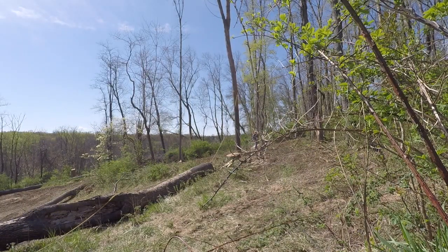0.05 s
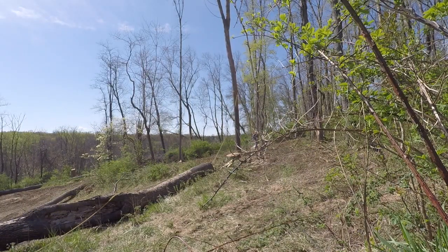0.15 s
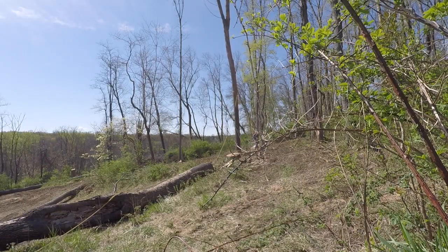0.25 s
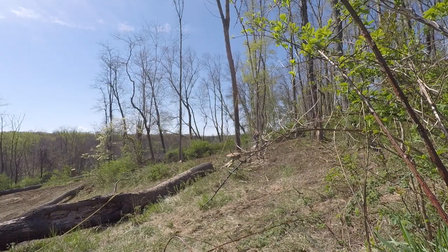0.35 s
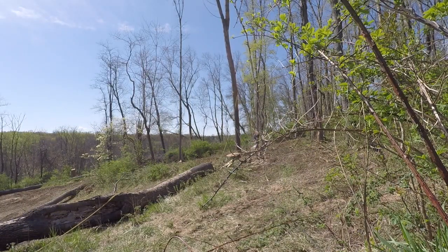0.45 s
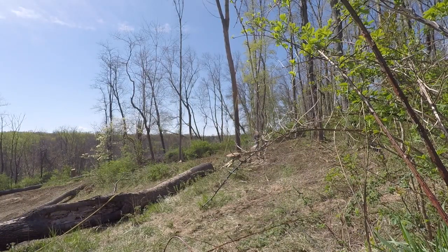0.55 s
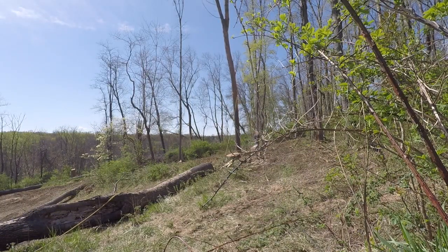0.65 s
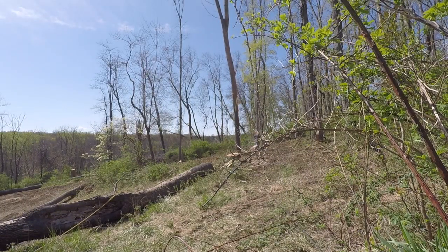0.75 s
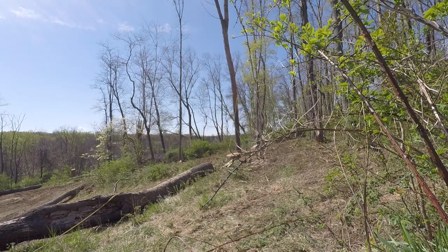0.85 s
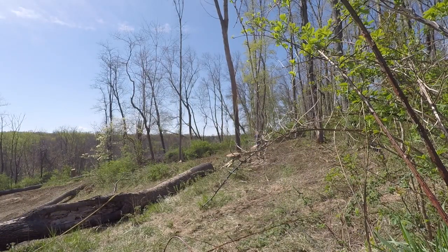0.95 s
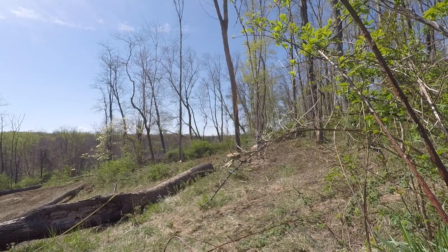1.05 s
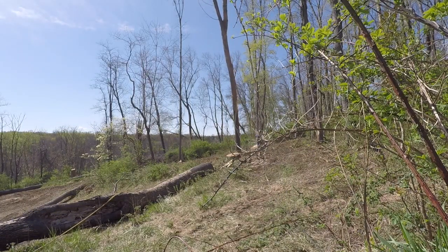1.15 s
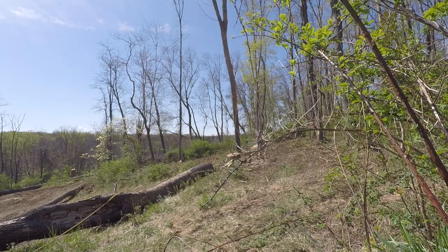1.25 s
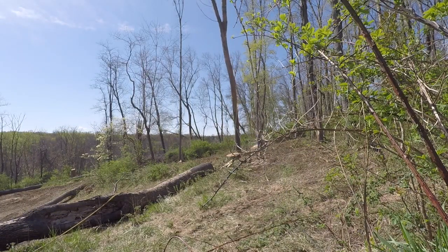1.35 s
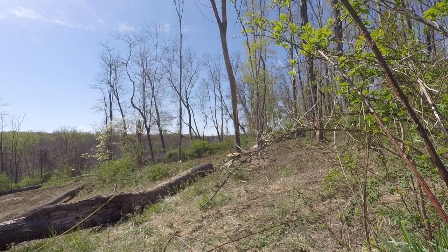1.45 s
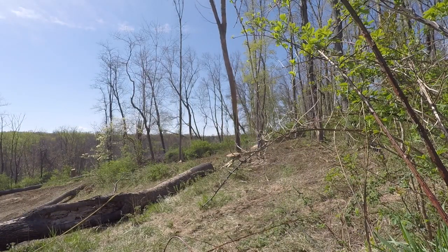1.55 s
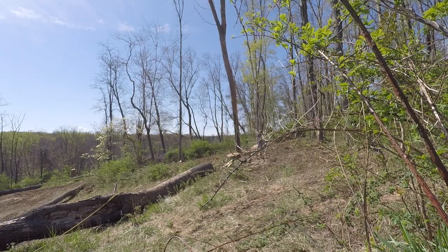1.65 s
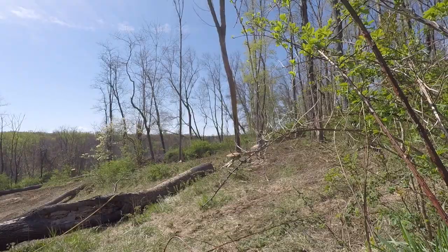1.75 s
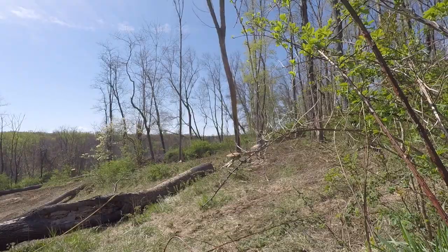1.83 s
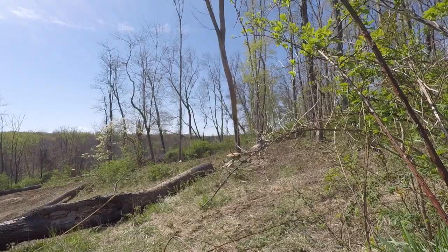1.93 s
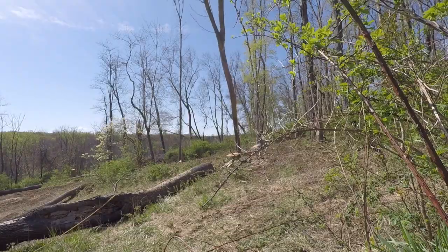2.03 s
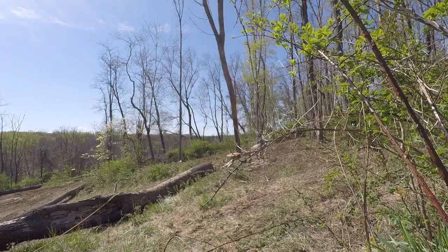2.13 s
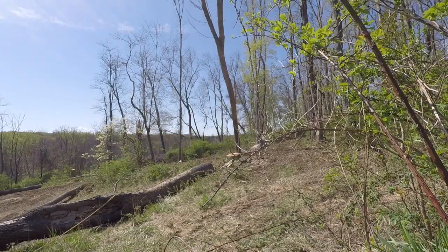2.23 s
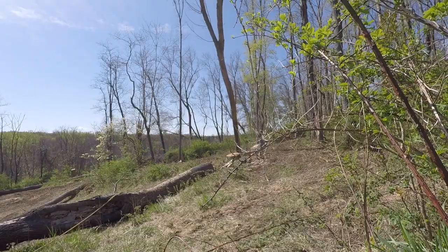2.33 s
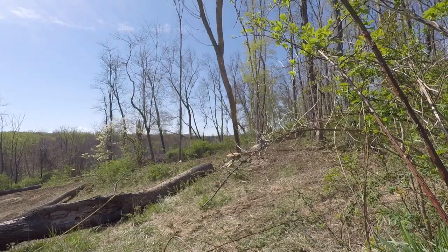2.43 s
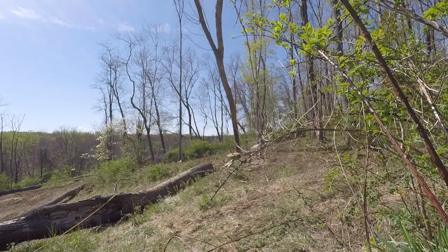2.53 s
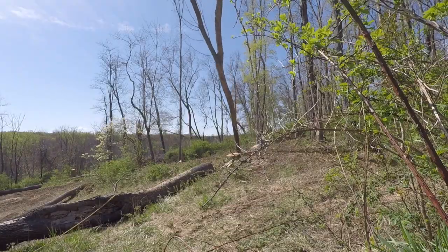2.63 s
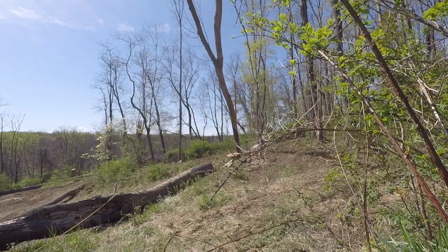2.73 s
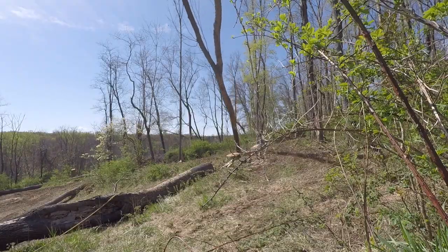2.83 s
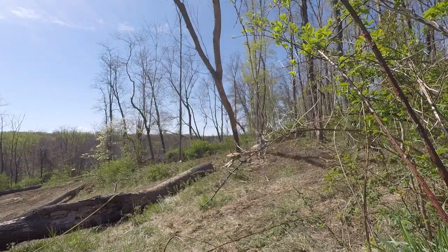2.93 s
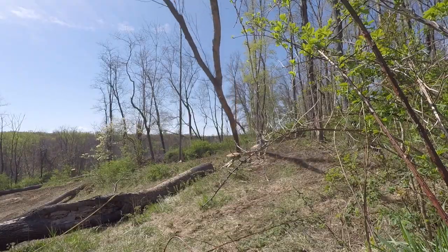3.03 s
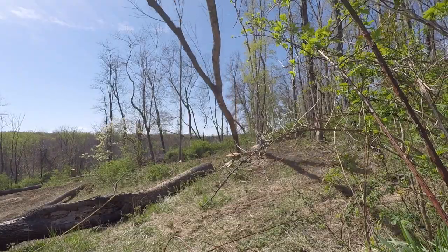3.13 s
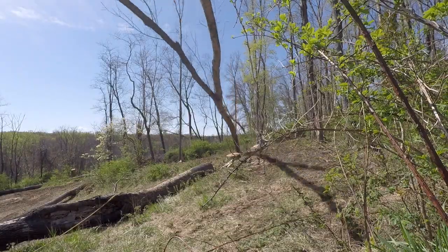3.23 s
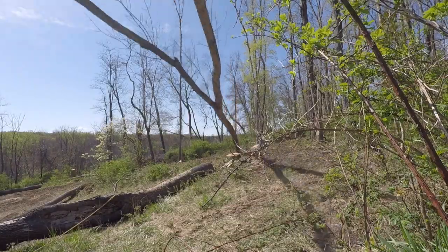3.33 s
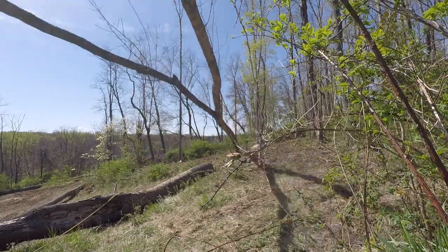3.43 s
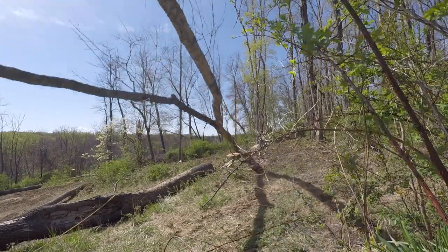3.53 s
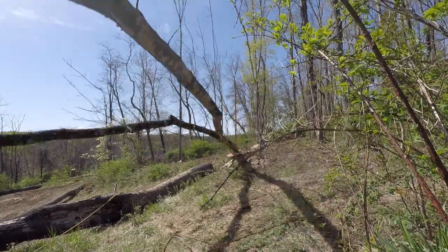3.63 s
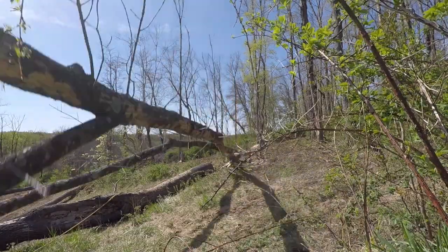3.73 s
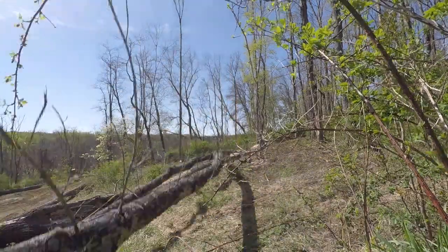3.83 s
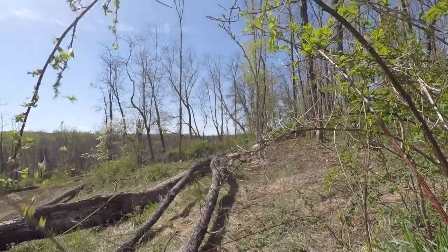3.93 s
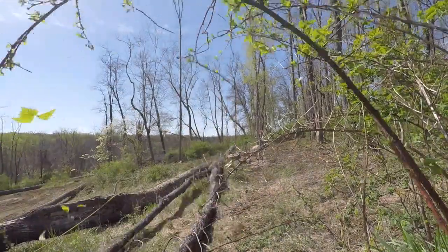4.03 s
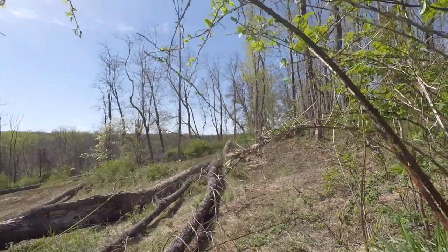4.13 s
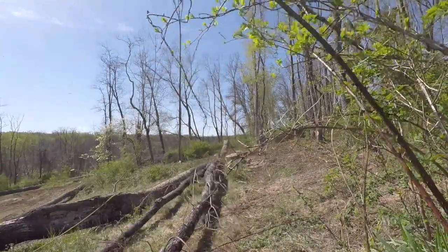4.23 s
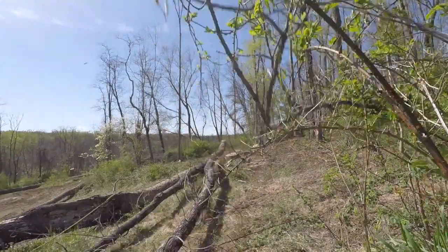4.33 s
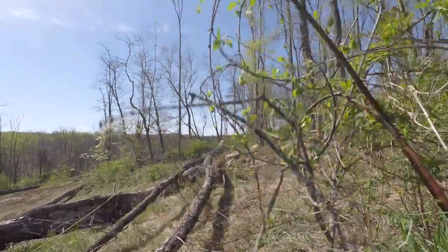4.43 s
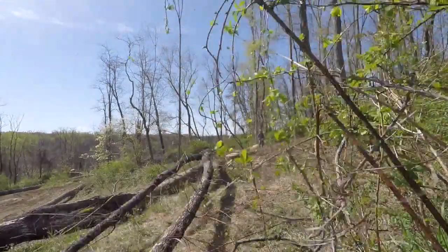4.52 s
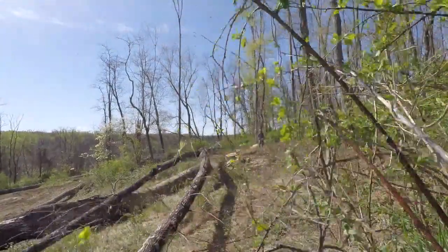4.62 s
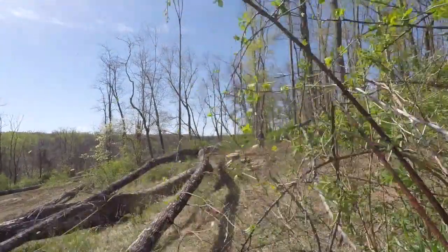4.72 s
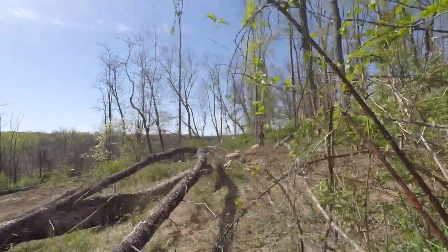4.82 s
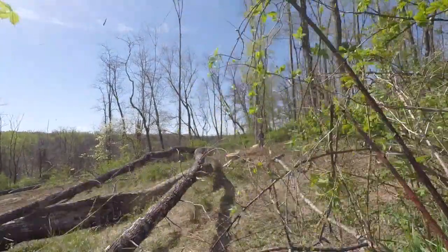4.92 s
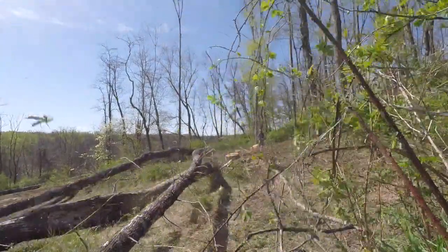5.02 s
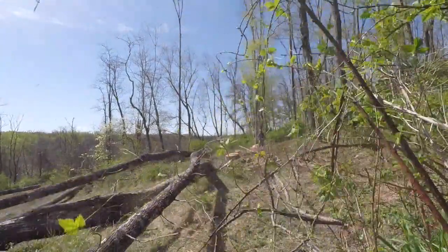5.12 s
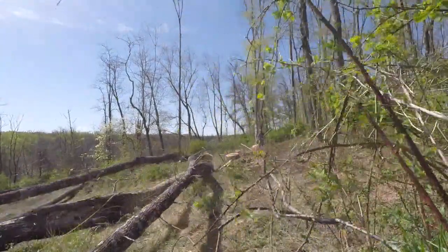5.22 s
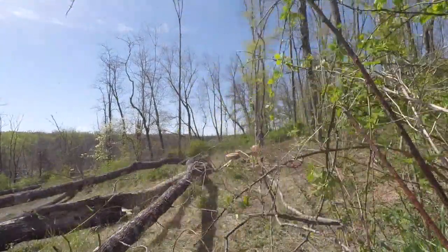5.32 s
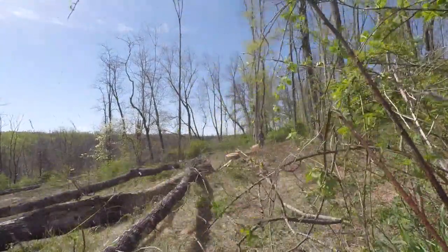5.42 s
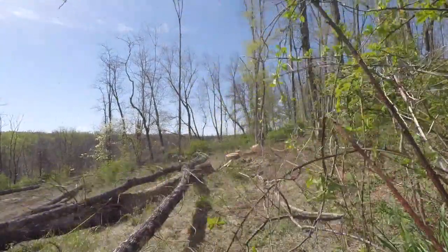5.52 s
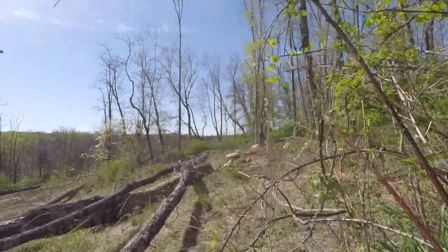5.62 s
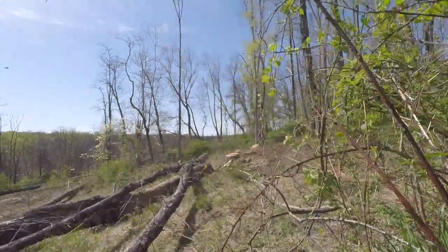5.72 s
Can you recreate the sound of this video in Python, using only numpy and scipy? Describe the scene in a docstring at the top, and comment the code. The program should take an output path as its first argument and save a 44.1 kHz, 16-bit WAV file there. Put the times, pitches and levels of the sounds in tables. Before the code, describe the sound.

A dead tree snaps and splinters at its base, topples with a rising swish and crashes down while a motor throbs slowly nearby.

```python
"""Dead tree falling in a woodlot

A motor throbs slowly, built from filtered exhaust puffs, while ringing snaps crack the base of a dead tree.
Stick-slip groans tip it over, and its crown swishes down as filtered noise that gathers speed.
Limbs shatter in crackle and ringing knocks, the trunk thuds as damped sines, then twigs and brush settle.
The surrounding trees scatter cracks, knocks and scrapes in noise tails; the crash overloads the microphone."""
import sys
import numpy as np
from scipy import signal
from scipy.fft import rfft, irfft, next_fast_len
from scipy.io import wavfile

SR = 44100
rng = np.random.default_rng(int(sys.argv[2]) if len(sys.argv) > 2 else 0)


def generate_wav(sig):
    """Save sig (samples, or channels by samples) to the path in sys.argv[1] as 16-bit PCM at SR."""
    pcm = np.round(np.clip(np.atleast_2d(sig).T, -1, 1) * 32767).astype(np.int16)
    wavfile.write(sys.argv[1], SR, pcm)


N = 254456  # length in samples

# Spectra give relative levels: the filtered noise or pulse train is brought to rms 1.

# level of the throb as heard; it dips at the crash, then slowly comes part of the way back:
# (time [s], level [dB])
THROB_LEVEL = [(0, -22.5), (3.4, -22), (3.85, -19.5), (4.15, -33), (4.45, -45), (5.0, -41.5), (5.77, -33)]
# colour of the exhaust puffs: (frequency [Hz], level [dB])
EXHAUST_SPECTRUM = [(8, -18), (19, 4.5), (38, -11.5), (57, -6.5), (76, -12), (100, -22.5), (150, -34),
                    (250, -34), (600, -82)]
# low rumble under the puffs: (frequency [Hz], level [dB per Hz])
RUMBLE_SPECTRUM = [(10, -16.5), (25, 2.5), (50, 3.5), (90, 2.5), (140, -12), (250, -20.5), (500, -67.5)]
# level of the clatter as heard, with a dip at the crash: (time [s], level [dB])
CLATTER_LEVEL = [(0, -38.5), (1.7, -38.5), (3.8, -36.5), (4.45, -50), (5.77, -38.5)]
# colour of the motor's clatter: (frequency [Hz], level [dB per Hz])
CLATTER_SPECTRUM = [(15, -42.5), (50, -30.5), (130, -26), (205, -35), (310, -29), (450, -33.5),
                    (660, -32.5), (850, -39.5), (1250, -38.5), (2000, -44.5), (3500, -52), (5000, -74),
                    (7600, -82.5)]
FIRING_HZ = 19.0

# rustle of breaking wood: (frequency [Hz], level [dB per Hz])
WOOD_SPECTRUM = [(200, -18), (500, 11.5), (850, 5.5), (1300, -3.5), (2000, -4), (2800, -8), (4000, -14),
                 (7500, -29)]
# fizz of fine twigs: (frequency [Hz], level [dB per Hz])
TWIG_SPECTRUM = [(1000, -11.5), (2500, 2), (3500, -1), (5000, -5), (7500, -14.5)]
# ticking of strained fibres, later of settling brush; the wood trim is added to the woody level:
# (time [s], woody crackle level before trim [dB], fine twig level [dB])
TICKING_LEVELS = [(0, -32, -46.5), (.75, -41, -69), (1.4, -39.5, -55), (2.2, -44.5, -77), (3.3, -37, -65.5),
                  (4.45, -41, -46.5), (4.85, -44, -52), (5.45, -50.5, -59.5)]
# splintering as the stump splits and boughs plough into brush; woody level again before its trim:
# (start [s], rise [s], hold [s], decay t60 [s], woody crackle [dB], fine twigs [dB], whoosh [dB])
SPLINTER_BURSTS = [(.005, 0.019, 0.039, 1.8, -43, -54, -40.5), (0.353, 0.043, 0.062, 0.46, -37, -60, -41.5),
                   (0.969, 0.016, 0.027, .5, -35, -45, -42), (1.114, 0.0054, 0.022, 0.76, -34, -41, -38.5),
                   (1.605, .003, .01, 0.41, -41, -44, -56), (3.685, 0.017, .02, .2, -27.5, -36.5, -29),
                   (3.795, .005, .02, 0.23, -19.5, -41, -17), (3.843, .008, 0.024, .25, -12.5, -27, -18.5),
                   (3.88, 0.0086, 0.025, 0.43, -16, -25, -13.5),
                   (3.92, 0.011, 0.02, 0.23, -14.5, -22.5, -21),
                   (4.03, 0.0091, 0.015, 0.36, -17, -39, -17.5),
                   (4.107, 0.063, 0.17, 0.34, -26.5, -40, -29.5),
                   (4.548, .004, 0.017, 0.13, -35.5, -49, -45.5), (4.632, .02, 0.052, .5, -51, -60.5, -47),
                   (4.992, .004, 0.018, 0.17, -34, -56, -37.5),
                   (5.031, 0.025, 0.013, 0.38, -29, -64, -28.5),
                   (5.268, 0.0087, 0.016, 0.26, -42.5, -57, -45),
                   (5.598, 0.064, 0.021, 0.45, -35, -46, -40), (5.701, 0.096, .02, .3, -23, -31.5, -26.5)]
# whoosh around its centre: (multiple of the centre frequency [ratio], level [dB per Hz])
WHOOSH_SHAPE = [(.15, -34.5), (.5, -3), (.8, -1), (1, -1), (1.3, -3.5), (1.8, -8), (3, -31.5), (8, -55.5)]
BOUGH_HZ = 239.4  # centre of a heavy bough's whoosh in the brush

# sharp snaps; the edge trim is added to the edge level:
# (time [s], ring peak [dB], ring pitch [Hz], bright edge peak before trim [dB], tearing [0-1])
CRACK_EVENTS = [(.038, -19, 1400, -30, 0.4), (.051, -12, 1110, -44, 0.2), (.114, -25, 2600, -32, .03),
                (.135, -26, 2400, -27.5, 0.2), (.291, -16, 1920, -22, 0.1), (.419, -16.5, 2640, -26, 0.06),
                (.437, -13.5, 2200, -36, 0.24), (.468, -22, 2480, -34, .1), (.564, -36, 1860, -27, 0.08),
                (.841, -30.5, 1910, -30, 0.26), (.921, -22, 1010, -38, 0.16), (.992, -26, 2390, -30, 0.3),
                (1.009, -12, 2260, -16, .1), (1.122, -16.5, 1250, -27, 0.46),
                (1.126, -11.5, 1890, -21, 0.2), (1.246, -21.5, 1410, -36.5, 0.5),
                (1.563, -24, 1510, -29, 0.25), (1.605, -24, 2920, -13.5, 0.17),
                (1.784, -24, 3020, -38, 0.08), (2.036, -34.5, 3300, -44, 0.26),
                (2.404, -30, 2020, -46, .35), (3.488, -12, 1730, -14.5, 0.08),
                (3.698, -31, 1830, -19, 0.44), (3.712, -19, 1320, -14.5, .6),
                (3.755, -13, 2120, -10.5, 0.23), (3.792, -28, 1840, -15, 0.14),
                (3.834, -2.5, 1670, -29, 0.34), (3.856, 0.5, 1090, -17, 0.36),
                (3.874, -8.5, 1110, -17, 0.4), (3.93, 1.5, 1230, -7, .03), (3.949, 3.5, 2250, -23, 0.02),
                (3.958, -3.5, 1340, -31, 0.3), (4.045, -4, 1400, -13.5, .2), (4.174, -14, 1300, -30, 0.15),
                (4.228, -8, 1630, -26, 0), (4.35, -21, 2520, -22.5, 0.6), (4.555, -21.5, 1700, -33, 0.41),
                (4.629, -20.5, 1990, -25.5, 0.02), (5.015, -15.5, 1500, -28, 0.02),
                (5.062, -8.5, 1550, -27, 0.12), (5.081, -14.5, 1430, -33, 0.14),
                (5.176, -25.5, 2960, -23, 0.23), (5.242, -23.5, 1920, -34, 0.11),
                (5.681, -21.5, 1530, -40, 0.2), (5.705, -25, 2400, -29, 0.1), (5.746, -18, 2300, -24.5, .3),
                (5.763, -16, 1100, -28, 0)]
SNAPS_PER_S, SNAPS_UNTIL_S = 9, 1.9  # lesser snaps in the straining stump
SNAP_DB, SNAP_FADE_DB_PER_S = -21.5, 5.5  # level at the start and how fast it falls
SNAP_HZ, SNAP_EDGE_DB = 2060, -20  # middle ring pitch; edge over ring, before the edge trim

# limbs knocking on each other and on fallen logs; the knock trim is added to the peak:
# (time [s], peak before trim [dB], ring pitch [Hz])
KNOCK_EVENTS = [(.04, -20.5, 1330), (.921, -28.5, 690), (1.123, -24, 1148), (2.405, -30, 2080),
                (3.801, -7, 884), (3.804, 3, 837), (3.848, -4.5, 1084), (3.856, -5.5, 970),
                (3.893, -3, 460), (4.008, -12, 935), (4.259, -22, 876), (4.335, -19, 710),
                (4.461, -28, 820), (4.554, -19, 874), (4.632, -32, 974), (4.693, -32, 886),
                (5.136, -23, 990), (5.177, -28.5, 2960), (5.501, -30.5, 810), (5.648, -31, 710),
                (5.705, -25, 1080), (5.753, -18, 846)]
# a limb's modes before random scatter: (multiple of ring pitch [ratio], level [dB], decay t60 [s])
LIMB_MODES = [(0.862, -14.5, 0.085), (0.998, 6.5, 0.023), (1.203, -4.5, 0.025), (1.7, -6.5, 0.017),
              (2.5, -10.5, 0.0069)]

# decay of the sound scattered by the trees: (frequency [Hz], decay t60 [s])
FOREST_DECAY = [(150, 0.27), (1200, 0.52), (7000, 0.75)]

# heavy blows passed into the soil; the short attack softens the peak:
# (time [s], level [dB], pitch [Hz], decay t60 [s])
THUD_EVENTS = [(0.984, -25.5, 140, 0.29), (1.129, -19.5, 152, 0.061), (2.028, -26.5, 298, .044),
               (2.984, -14.5, 130, 0.11), (3.862, -6, 55, 0.088), (3.877, -18, 42, 0.22),
               (3.894, -2, 47.3, 0.31), (3.971, 18.5, 147, 0.02), (3.974, -1.5, 56.4, 0.25),
               (3.997, -3.5, 108, 0.14), (4.049, -14.5, 73, .32), (4.845, -24.5, 125, .049),
               (5.416, -25, 103.6, 0.28), (5.441, -25, 133, 0.16), (5.641, -14, 208, 0.028)]
# colour of the ground's rumble: (frequency [Hz], level [dB per Hz])
SOIL_SPECTRUM = [(12, -16), (30, 6.5), (70, -3), (130, -3.5), (250, -32.5), (500, -40)]
SHAKE_DB, SHAKE_RISE_S, SHAKE_T60 = -19.5, 0.12, 0.29  # the ground heaves under the landing
ROLL_DB, ROLL_T60 = -15.5, 1.64  # and rumbles on as the trunk rolls

# airy hiss of the crown's twigs: (frequency [Hz], level [dB per Hz])
HISS_SPECTRUM = [(300, -5), (600, 1.5), (1100, -3.5), (2000, -2.5), (3200, -6.5), (5000, -12), (7500, -20)]
LANDING_S = 3.79  # the crown reaches the ground
SPEEDUP_DB_PER_S, BRAKE_DB_PER_S = 16.5, 70  # toppling gathers speed exponentially; the ground stops it
AIR_DB, WHOOSH_DB = -30, -22  # hiss and whoosh at landing speed
WHOOSH_GROWS = 1.18  # dB of whoosh per dB of speed
WHOOSH_HZ, WHOOSH_RISES = 243, .2  # centre at landing speed, and its power of speed

# low modes of the trunk: (frequency before the groan's pitch factor [Hz], Q [ratio], level [dB])
TRUNK_MODES = [(135, 3.9, 2), (215.6, 8.5, 9.5), (277, 7.2, -5), (500, 4.9, -22)]
# short spurts of groaning as the trunk tips; length includes the rise:
# (start [s], length [s], level [dB], pitch over the trunk's modes [ratio])
GROAN_SPURTS = [(2.678, 0.041, -31.5, 1.1), (2.765, .04, -27.5, 1.05), (2.832, 0.073, -25, 0.95),
                (2.937, 0.035, -27, 2.02), (2.94, 0.054, -35, 0.98), (3.417, 0.083, -29, 1.04)]
GROAN_RISE_S, GROAN_T60 = 0.019, 0.25

# limbs scraping along logs as they settle:
# (start [s], rise [s], hold [s], level [dB], ring pitch [Hz])
SCRAPE_EVENTS = [(4.447, .012, 0.014, -36.5, 800), (4.552, .008, 0.013, -33, 800),
                 (4.647, 0.013, 0.023, -35.5, 820), (5.677, 0.057, .03, -33, 1000),
                 (5.733, .02, .02, -22.5, 875)]
SCRAPE_T60 = 0.075  # s

TOP_HZ = 7700  # the microphone's band limit


def amp(db):
    """Decibels to gain."""
    return 10 ** (np.asarray(db) / 20)


def unit(x):
    """Scale to rms 1."""
    return x / np.sqrt(np.mean(x ** 2) + 1e-20)


def along(points, hz):
    """Read a curve of (Hz, value) points on a log frequency axis."""
    f, v = np.transpose(points)
    return np.interp(np.log(hz + 1), np.log(f + 1), v)


def curves(rows):
    """One level per sample for each column after the time."""
    s, *cols = np.transpose(rows)
    return [np.interp(np.arange(N) / SR, s, c) for c in cols]


def add(track, s, sound):
    """Mix a sound into a track at a time in seconds."""
    part = track[max(round(s * SR), 0):][:len(sound)]
    part += sound[:len(part)]


def swell(start, rise, hold, t60):
    """Gain that rises to 1, holds and dies away."""
    t = np.arange(N) / SR - start
    opening = np.clip(t / max(rise, 1 / SR), 0, 1)
    return opening * amp(-60 * np.maximum(t - rise - hold, 0) / t60)


def coloured(x, spectrum):
    """Causal filter with the given (Hz, dB) shape; the result has rms 1."""
    m = 2 * next_fast_len(N // 2 + SR // 4)
    cepstrum = irfft(np.log(amp(along(spectrum, np.fft.rfftfreq(m, 1 / SR))) + 1e-6))
    # folding the cepstrum forward makes the filter minimum phase
    cepstrum[1:m // 2] *= 2
    cepstrum[m // 2 + 1:] = 0
    response = np.exp(rfft(cepstrum))
    return unit(irfft(rfft(x, m) * response)[:N])


def resonance(x, hz, q):
    """One damped mode, scaled to peak 1."""
    y = signal.lfilter(*signal.iirpeak(min(hz, SR / 4), max(q, .7), SR), x)
    return y / np.abs(y).max()


def lowpass(x, hz):
    """Dull a sound above a frequency with a gentle second-order slope."""
    return signal.sosfilt(signal.butter(2, hz, fs=SR, output='sos'), x)


def motor(jitter_s=0.00079, scatter_db=0.5, repeating=0.79, rumble_db=-13):
    """One exhaust puff per firing, over a rumble and a clatter that partly repeats at the firing rate."""
    count = int(N / SR * FIRING_HZ)
    chance = rng.standard_normal((count, 2))
    times = (np.arange(count) + .7) / FIRING_HZ + jitter_s * chance[:, 0]
    places = np.clip(times * SR, 0, N - 1).astype(int)
    puffs = np.bincount(places, amp(scatter_db * chance[:, 1]), N)
    exhaust = coloured(puffs - puffs.mean(), EXHAUST_SPECTRUM)
    rumble = amp(rumble_db) * coloured(rng.standard_normal(N), RUMBLE_SPECTRUM)
    throb = amp(curves(THROB_LEVEL)[0]) * (exhaust + rumble)
    turn = np.resize(rng.standard_normal(round(SR / FIRING_HZ)), N)
    clatter = coloured(rng.standard_normal(N) + repeating * turn, CLATTER_SPECTRUM)
    return throb + amp(curves(CLATTER_LEVEL)[0]) * clatter


def crackle(rate, hz, pitch_spread, spread_db, cycles):
    """Tiny breaks at random times, each ringing briefly at its own pitch; a few are much stronger."""
    chance = rng.random((int(rate * N / SR), 4))
    t = np.arange(SR // 150) / SR
    octaves = pitch_spread * (chance[:, :1] + chance[:, 1:2] - 1)
    pitch = np.minimum(hz * 2 ** octaves, SR / 4)
    size = amp(spread_db * np.minimum(-np.log(1 - chance[:, 2:3]), 3.5))
    waves = size * np.sin(2 * np.pi * pitch * t) * np.exp(-pitch * t / cycles)
    where = (chance[:, 3:] * N).astype(int) + np.arange(len(t))
    return unit(np.bincount(where.ravel(), waves.ravel(), N)[:N])


def burst_gains():
    """Gains of woody crackle, fine twigs and whoosh; overlapping bursts add in power."""
    rows = np.array(SPLINTER_BURSTS)
    shapes = np.array([swell(*row[:4]) for row in rows])
    return np.sqrt(amp(rows[:, 4:]).T ** 2 @ shapes ** 2)


def splinters(rustle=0.74, fizz=1.0, wood_trim_db=-2.0):
    """Many fibres and twigs break, thick ones woody, thin ones crisp, over the rustle and whoosh of brush."""
    wood_gain, twig_gain, whoosh_gain = burst_gains()
    wood_ticks, twig_ticks = amp(curves(TICKING_LEVELS))
    wood = rustle * coloured(rng.standard_normal(N), WOOD_SPECTRUM)
    wood += crackle(rate=700, hz=1643, pitch_spread=1.52, spread_db=2.5, cycles=2.45)
    twigs = fizz * coloured(rng.standard_normal(N), TWIG_SPECTRUM)
    twigs += crackle(rate=380, hz=4200, pitch_spread=2.0, spread_db=5.5, cycles=0.91)
    whoosh = coloured(rng.standard_normal(N), [(BOUGH_HZ * k, db) for k, db in WHOOSH_SHAPE])
    woody = amp(wood_trim_db) * np.hypot(wood_gain, wood_ticks) * unit(wood)
    return woody + np.hypot(twig_gain, twig_ticks) * unit(twigs) + whoosh_gain * whoosh


def lesser_snaps(scatter_db=3, octaves=0.38, tearing=0.29):
    """Small snaps at random moments, weaker as the stump gives way; rows like those of CRACK_EVENTS."""
    chance = rng.uniform(-1, 1, (int(SNAPS_PER_S * SNAPS_UNTIL_S), 3))
    for k, (when, size, pitch) in enumerate(chance):
        s = (k + (1 + when) / 2) / SNAPS_PER_S
        db = SNAP_DB - SNAP_FADE_DB_PER_S * s + scatter_db * size
        yield s, db, SNAP_HZ * 2 ** (octaves * pitch), db + SNAP_EDGE_DB, tearing


def cracks(q=2.38, tear_t60=0.034, edge_t60=0.024, edge_hz=4800, edge_q=1.44, edge_trim_db=0.5):
    """A sudden break, then a short run of tearing fibres, rings the wood and gives a bright edge."""
    track, t = np.zeros(N), np.arange(SR // 10) / SR
    for s, db, hz, edge_db, tearing in [*CRACK_EVENTS, *lesser_snaps()]:
        fibres = tearing * rng.standard_normal((2, len(t))) * (rng.random((2, len(t))) < .4)
        fibres[:, 0] = 1  # the break itself
        ring = lowpass(resonance(fibres[0] * amp(-60 * t / tear_t60), hz, q), min(2 * hz, SR / 3))
        edge = resonance(fibres[1] * amp(-60 * t / edge_t60), edge_hz, edge_q)
        add(track, s, amp(db) * ring / np.abs(ring).max() + amp(edge_db + edge_trim_db) * edge)
    return track


def knocks(scatter_db=1.5, detune=0.016, attack_s=0.001243, trim_db=2.0):
    """Blunt contacts ring a limb's few damped modes, a little differently each time."""
    track, t = np.zeros(N), np.arange(SR // 8) / SR
    for s, db, hz in KNOCK_EVENTS:
        ring = np.zeros(len(t))
        chance = rng.standard_normal((len(LIMB_MODES), 2))
        for (ratio, level, t60), (louder, sharper) in zip(LIMB_MODES, chance):
            pitch = hz * ratio * (1 + detune * sharper)
            ring += amp(level + scatter_db * louder - 60 * t / t60) * np.sin(2 * np.pi * pitch * t)
        ring *= 1 - np.exp(-t / attack_s)
        add(track, s - attack_s, amp(db + trim_db) * ring / np.abs(ring).max())
    return track


def forest(x):
    """The standing trees scatter the sound into a thin noise tail, redrawn for every fifth of a second."""
    wet, hop = np.zeros(N), SR // 5
    for start in range(0, N, hop):
        hz, t, z = signal.stft(rng.standard_normal(SR // 2), SR, nperseg=256)
        decay = amp(-60 * t / along(FOREST_DECAY, hz)[:, None])
        tail = signal.istft(z * decay, SR, nperseg=256)[1]
        scattered = signal.fftconvolve(x[start:start + hop], tail / np.linalg.norm(tail))
        add(wet, start / SR + .006, scattered)
    return wet


def ground(attack_s=0.00055):
    """Trunk and limbs strike the soil in dull, heavily damped blows, and the ground rumbles."""
    track, t = np.zeros(N), np.arange(SR // 2) / SR
    for s, db, hz, t60 in THUD_EVENTS:
        add(track, s, amp(db - 60 * t / t60) * np.sin(2 * np.pi * hz * t) * (1 - np.exp(-t / attack_s)))
    shake = amp(SHAKE_DB) * swell(LANDING_S, SHAKE_RISE_S, 0, SHAKE_T60)
    roll = amp(ROLL_DB) * swell(LANDING_S, SHAKE_RISE_S, 0, ROLL_T60)
    return track + (shake + roll) * coloured(rng.standard_normal(N), SOIL_SPECTRUM)


def crown():
    """Limbs shed eddies in a low whoosh that rises with their speed; fine twigs hiss."""
    since = np.arange(N) / SR - LANDING_S
    speed_db = np.minimum(SPEEDUP_DB_PER_S * since, -BRAKE_DB_PER_S * since)
    hz, t, z = signal.stft(rng.standard_normal(N), SR, nperseg=2048)
    frame_speed_db = np.interp(t - LANDING_S, since, speed_db)
    centre = np.maximum(WHOOSH_HZ * amp(WHOOSH_RISES * frame_speed_db), 20)
    multiple, shape_db = np.transpose(WHOOSH_SHAPE)
    band_db = np.interp(np.log((hz[:, None] + 1) / centre), np.log(multiple), shape_db)
    band = amp(band_db) / np.sqrt(centre)  # a wider band is no louder
    whoosh = unit(signal.istft(z * band, SR, nperseg=2048)[1][:N])
    hiss = coloured(rng.standard_normal(N), HISS_SPECTRUM)
    return amp(WHOOSH_DB + WHOOSH_GROWS * speed_db) * whoosh + amp(AIR_DB + speed_db) * hiss


def groan(slips_per_s=95, unevenness=.45, scatter_db=2, dull_hz=600):
    """Torn fibres stick and slip at an uneven rate and ring the low modes of the trunk."""
    chance = rng.standard_normal((int(2 * slips_per_s * N / SR), 2))
    times = np.cumsum(np.exp(unevenness * chance[:, 0])) / slips_per_s
    slips = np.bincount((times * SR).astype(int), amp(scatter_db * chance[:, 1]), N)[:N]
    slips = lowpass(slips, dull_hz)
    track = np.zeros(N)
    for s, length, db, pitch in GROAN_SPURTS:
        body = sum(amp(level) * unit(resonance(slips, hz * pitch, q)) for hz, q, level in TRUNK_MODES)
        track += amp(db) * swell(s, GROAN_RISE_S, length - GROAN_RISE_S, GROAN_T60) * unit(body)
    return track


def scrapes(catches_per_s=900, q=2.7, dull_hz=2200):
    """Bark catches on bark many times a second and keeps the limb's main mode ringing."""
    track = np.zeros(N)
    for s, rise, hold, db, hz in SCRAPE_EVENTS:
        catches = rng.standard_normal(N) * (rng.random(N) < catches_per_s / SR)
        ring = lowpass(resonance(catches, hz, q), min(dull_hz, SR / 3))
        track += amp(db) * swell(s, rise, hold, SCRAPE_T60) * unit(ring)
    return track


def scene():
    """The falling tree and the motor, in one channel."""
    timber = cracks() + knocks() + scrapes()
    scattered = amp(-12.5) * forest(timber)
    mix = motor() + splinters() + timber + scattered + ground() + crown() + groan()
    return mix[None]


def record(dry):
    """The microphone rounds off the loudest peaks and cuts steeply above its band limit."""
    clipped = dry / (1 + np.abs(dry / .87) ** 6) ** (1 / 6)
    m = next_fast_len(N + SR // 2)
    hz = np.fft.rfftfreq(m, 1 / SR)
    band_limit = 1 / np.sqrt(1 + (hz / TOP_HZ) ** 160)
    return irfft(rfft(clipped, m) * band_limit, m)[..., :N]


dry = scene()
out = record(dry)
generate_wav(out)
```